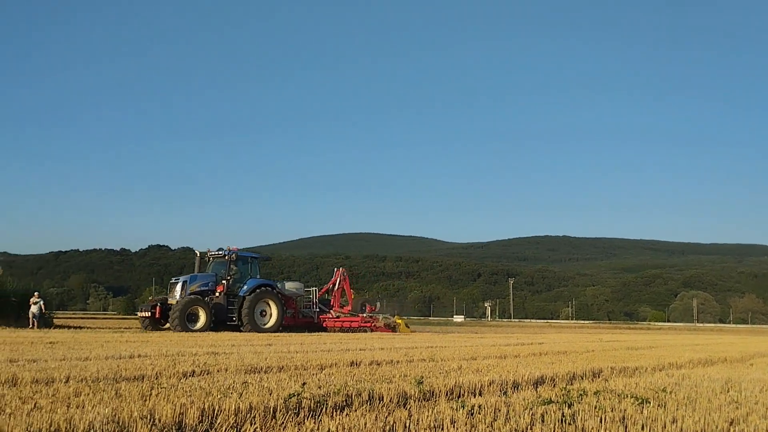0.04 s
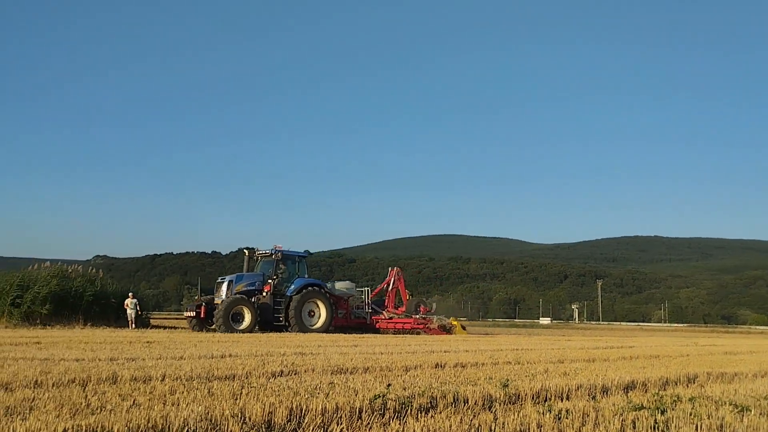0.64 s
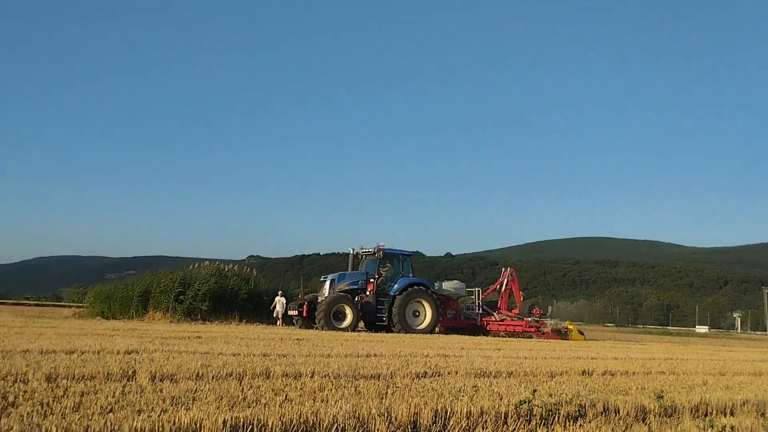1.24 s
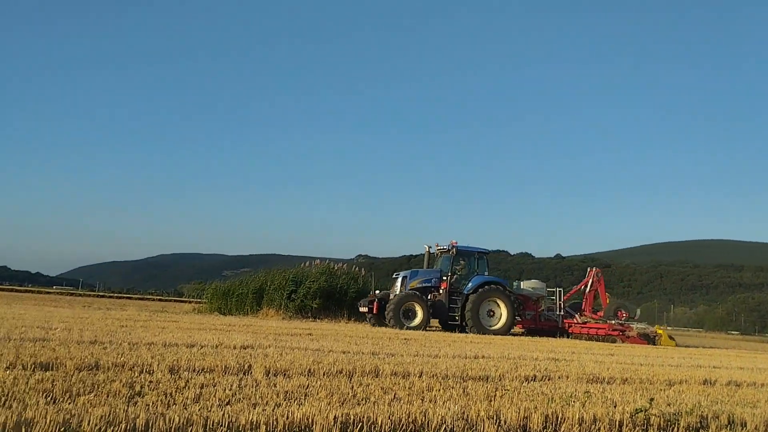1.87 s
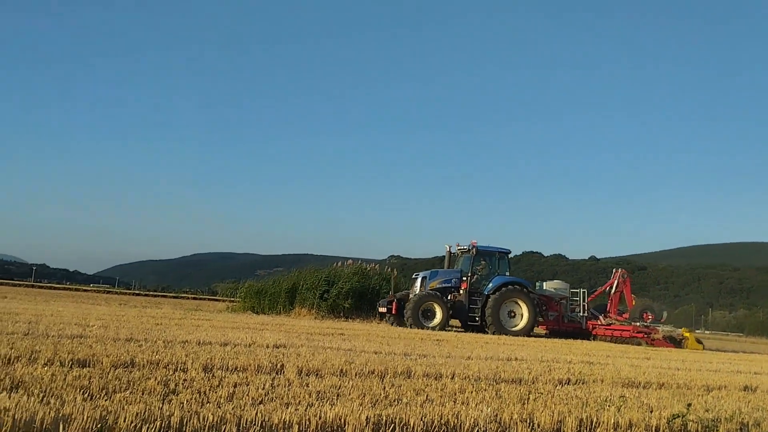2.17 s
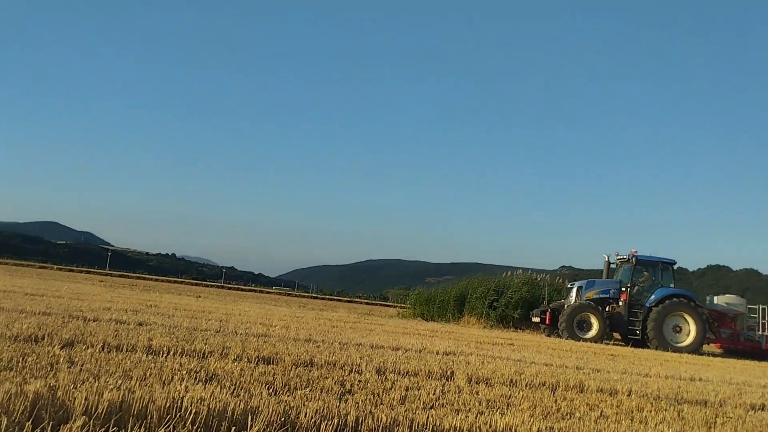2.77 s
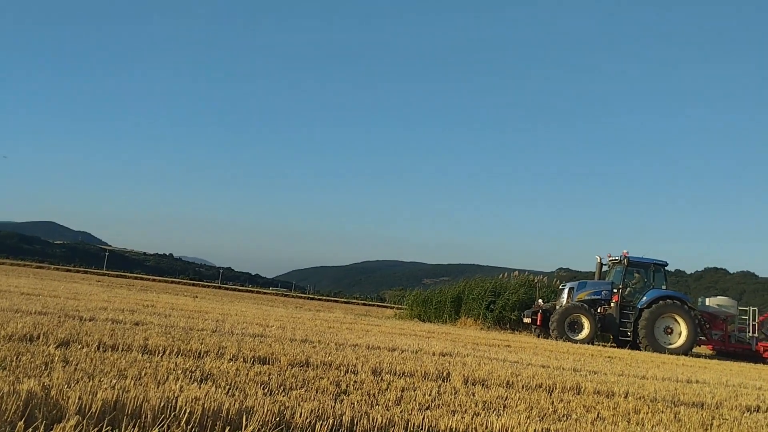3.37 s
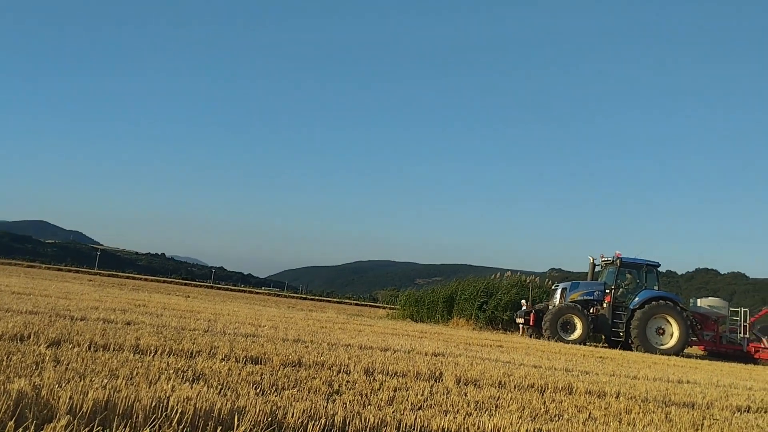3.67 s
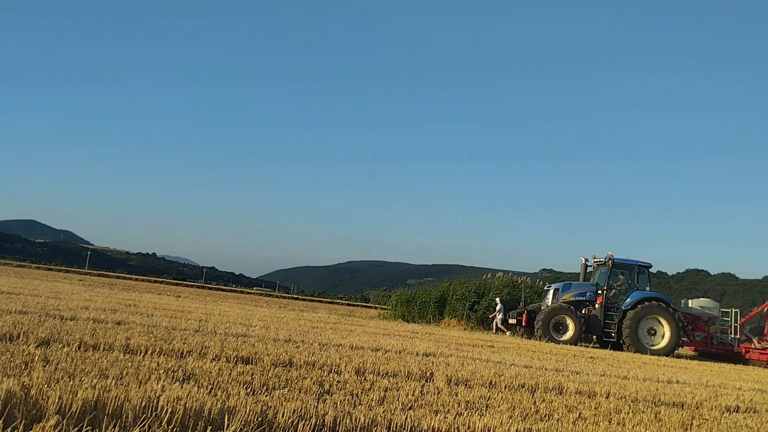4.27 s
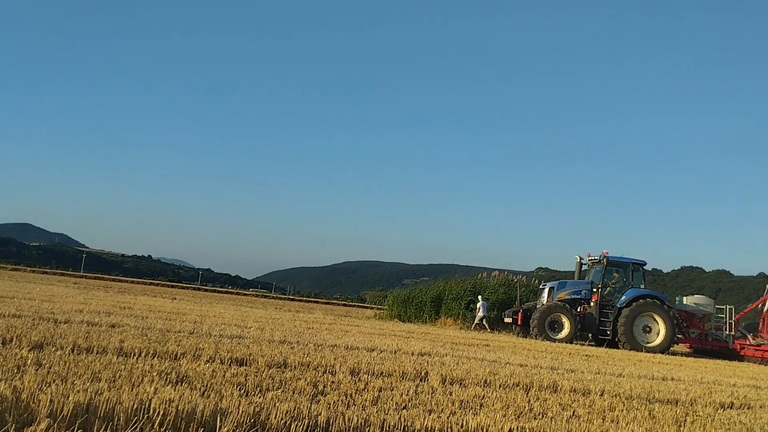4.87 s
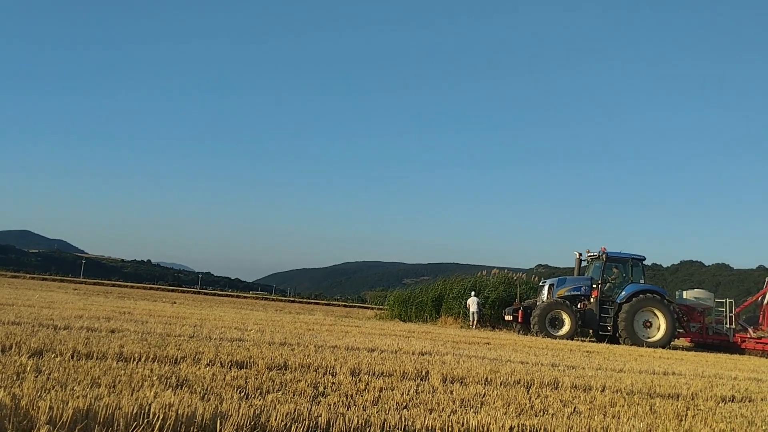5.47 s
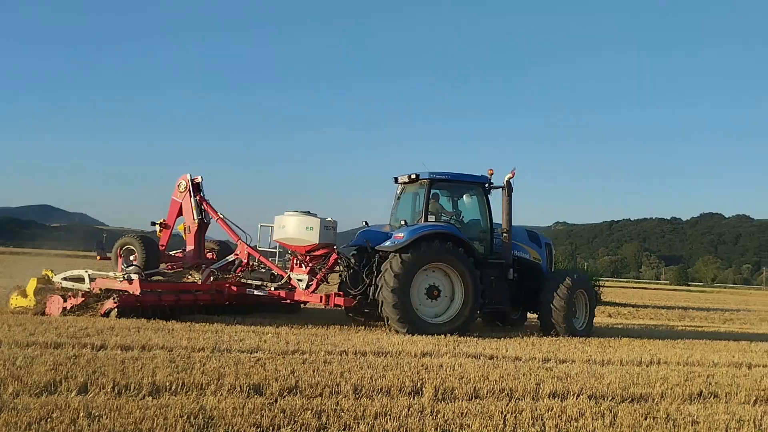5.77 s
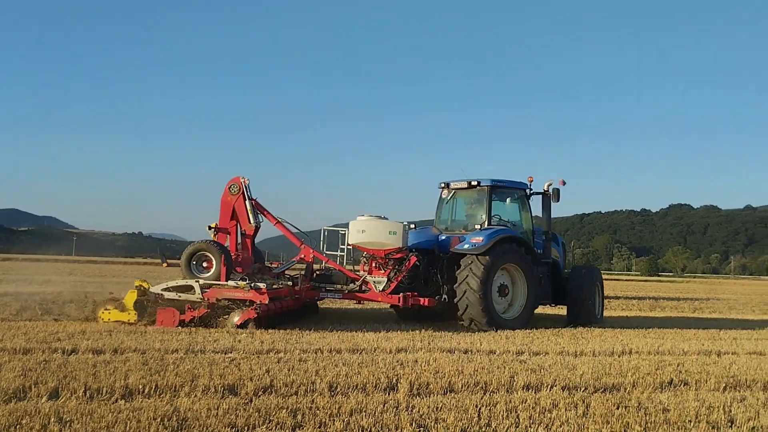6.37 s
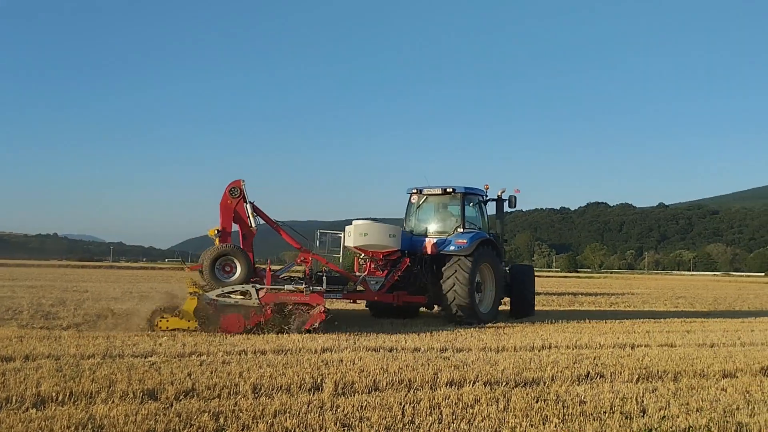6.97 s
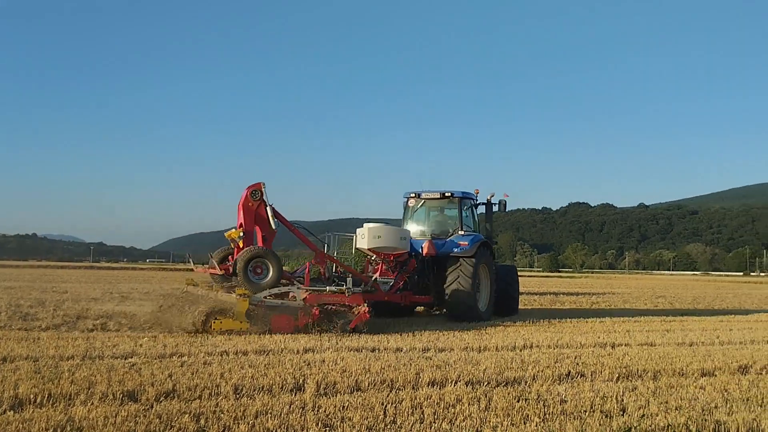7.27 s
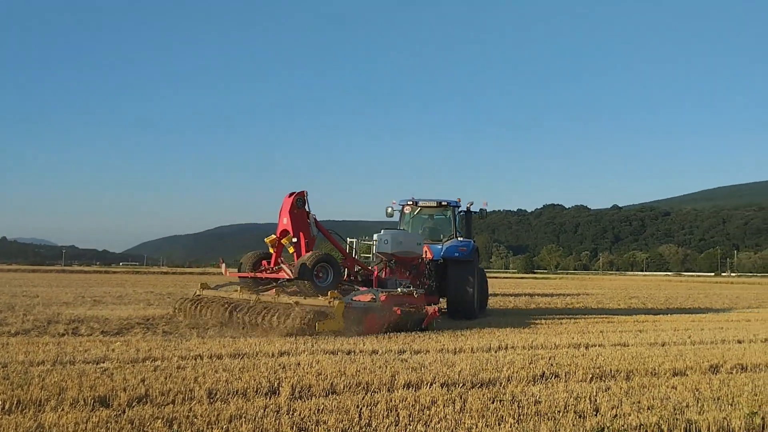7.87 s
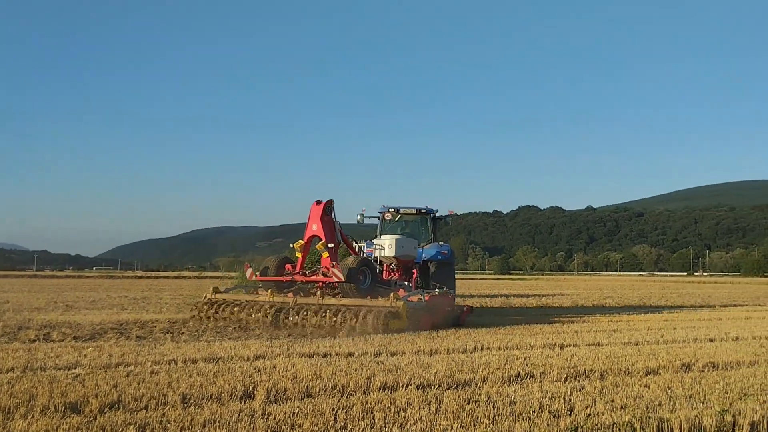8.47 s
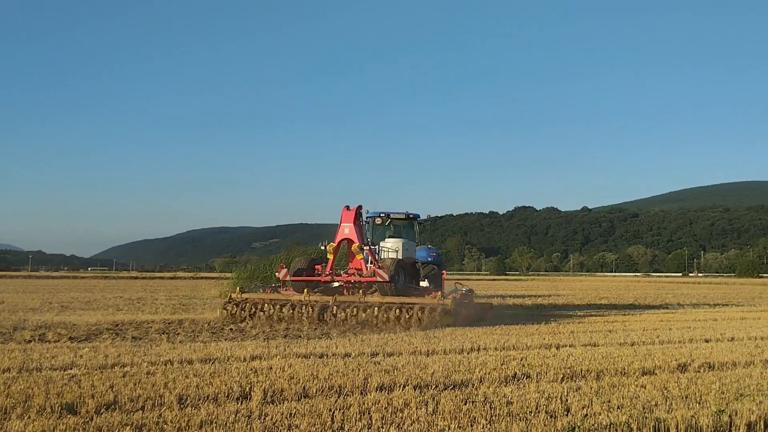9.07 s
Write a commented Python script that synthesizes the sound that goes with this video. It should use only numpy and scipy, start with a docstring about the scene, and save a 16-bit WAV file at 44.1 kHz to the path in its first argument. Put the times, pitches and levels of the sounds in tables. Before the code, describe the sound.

A diesel tractor drones across a field in a gusty breeze, then suddenly roars past close by, stones clinking on its harrow, and draws away.

```python
"""A six-cylinder diesel tractor drags a disc harrow over stubble, in two shots in a gusty breeze.
First it approaches from afar, sagging under load: the exhaust booms at the firing rate under injection
clatter, engine overtones, fan and gear whine, turbo hiss and high singing steel. Just past a second in,
the turbo blows off and the revs recover. After a cut at 5.5 s it roars past close by, stones clink on
the discs, and it draws away, the hood hiding more of the clatter, until a low engine hum swells."""
import sys
import numpy as np
from scipy import signal
from scipy.fft import rfft, irfft, next_fast_len
from scipy.io import wavfile
from scipy.ndimage import uniform_filter1d, map_coordinates

SR = 44100
rng = np.random.default_rng(int(sys.argv[2]) if len(sys.argv) > 2 else 0)


def waveform_to_disk(signal):
    """Save audio, clipped to [-1, 1], as 16-bit WAV at the path in sys.argv[1]."""
    frames = np.transpose(np.atleast_2d(signal))
    scaled = np.clip(frames, -1, 1) * 32767
    samples = np.round(scaled).astype(np.int16)
    wavfile.write(sys.argv[1], SR, samples)


N = 406602
TIME = np.arange(N) / SR

# engine speed, sagging whenever the discs bite: (time [s], firing rate [Hz])
ENGINE_SPEED = [(0.0, 92.9), (0.33, 87.65), (1.04, 86.34), (1.18, 94.42), (1.34, 94.2), (2.06, 91.1),
                (2.72, 90.08), (3.1, 92.22), (5.64, 93.01), (6.0, 91.56), (6.35, 93.97), (6.55, 92.66),
                (7.22, 93.52), (8.03, 92.96), (8.3, 90.58), (8.88, 88.17), (9.2, 88.64)]
# base mix of the far shot, by layer: (level [dB])
FAR_MIX = dict(boom=-22, octave=-34, rumble=-33, orders=-30.5, roar=-42, clatter=-39, rattle=-46.5, hiss=-55.5)
# tone colour of exhaust and running gear, front and rear: (frequency [Hz], relative level [dB])
FRONT_PIPE = [(15, 14), (35, -10), (70, -5), (160, -2), (220, -5), (290, -3), (370, -13), (440, -18),
              (560, -19.5), (690, -18), (800, -16), (930, -21.5), (1070, -16), (1180, -16.5)]
REAR_PIPE = [(15, -12), (35, -3), (70, 1), (160, -3), (220, 0), (290, -8), (370, -10.5), (440, -10.5),
             (560, -13.5), (690, -5.5), (800, -9), (930, -8.5), (1070, -11), (1180, -26.5)]
# tone colour of engine block and air flow, front and rear: (frequency [Hz], relative level [dB])
FRONT_BLOCK = [(1450, -3.5), (1950, -5), (2200, -1), (2700, -4.5), (3150, -9), (3380, -8.5), (3850, -13),
               (4750, -14), (5250, -16.5), (7100, -18.5), (8000, -28.5), (9500, -27.5), (11000, -35.5),
               (12500, -25.5), (15700, -28)]
REAR_BLOCK = [(1450, 1), (1950, -5), (2200, 0), (2600, -7), (3300, -12.5), (4100, -13), (4750, -15.5),
              (5400, -15.5), (7100, -18.5), (8300, -31), (9500, -24.5), (11000, -28), (12500, -21),
              (15700, -19.5)]
# stereo image, front and rear: (frequency [Hz], left-right correlation [0-1])
FRONT_IMAGE = [(25, 0.42), (70, 1), (200, 0.99), (1000, 0.96), (2500, 0.84), (4000, 0.8), (7000, 0.47),
               (12000, 0.28)]
REAR_IMAGE = [(25, 0.35), (70, 0.78), (200, 1), (1000, 0.92), (2300, 0.86), (3500, 0.4), (6000, 0.21),
              (12000, .1)]
# throb of unequal cylinders, relative to the "orders" layer:
# (pitch [x four-stroke cycle rate], front level [dB], rear level [dB])
THROB = [(2, -9, -27), (3, -24, -32), (4, -33, -34), (8, -20, -23.5), (9, -11.5, -17.5), (10, -12.5, -18),
         (11, -17.5, -18), (13, -22.5, -26), (14, -9, -24.5), (18, -17, -36), (24, -16, -32.5)]
# engine overtones with fan and gear whine, locked to the crankshaft: (pitch [x cycle rate])
WHINE_ORDERS = [10.45, 25.85, 28, 32, 33, 38, 42, 44, 45, 48, 51.65, 57, 67.15, 68.1]
# those tones relative to the roar:
# (front level [dB], abeam level [dB], change on turning away [dB/rad], change behind the harrow [dB])
WHINE_LEVELS = [(-23, -13.5, 8, 6), (-7, -20, 9.5, -6), (-29, -19.5, 10.5, -11.5), (-22, -29, 16.5, -7.5),
                (-14.5, -34, -7, -9), (-21.5, -18, 1, -3), (-26.5, -18, 1, -7), (-25, -12.5, -0.5, -4),
                (-20.5, -21, 1, -3), (-12, -36, 1, -1), (-17.5, -5, -6.5, 3), (-26, -13.5, -6, -5),
                (-31, -19.5, 11, -17), (-26, -14.5, 5.5, -13)]
# tones of the lugging engine: (pitch [x cycle rate], level [dB], middle of fade-out [s])
LUGGING_TONES = [(10.5, -39.5, 1.25), (57, -56, 2.4), (60, -59, 2.4), (69, -59, 2.4), (75, -56, 2.6),
                 (81, -57, 2.4)]
# spells of turbo whistle: (start [s], end [s], pitch [Hz], level [dB])
TURBO_SPELLS = [(-.5, 1.4, 9200, -67), (5.5, 5.8, 10480, -61), (5.85, 6.45, 10525, -55.5),
                (6.4, 7.1, 5160, -58)]
# tone colour of the wind: (frequency [Hz], relative level [dB])
WIND_COLOUR = [(10, -2), (25, 0), (45, 1), (90, 2)]
# gusts: (centre [s], length [s], lift above the lull [dB])
GUSTS = [(2.4, 4.8, 13), (4.3, 1.8, 9.4), (5.5, 1.2, 19), (8.4, 2.1, 16)]
# narrow ringing bands: high steel singing, plus a low engine hum as the tractor draws away:
# (start [s], end [s], pitch [Hz], half-width [Hz], level [dB])
RINGING_BANDS = [(.45, 2.2, 1086, 79, -47), (0.599, 2.6, 2170, 68.8, -47.5), (.75, 1.26, 4170, 130, -56),
                 (1.6, 2.3, 4750, 90, -60), (2.45, 3.05, 4640, 85, -55.5), (3.05, 4.4, 4720, 110, -63.5),
                 (3.2, 5.5, 3370, 82, -60), (4.42, 4.9, 4764, 100, -57.5), (4.45, 5.45, 6800, 240, -58),
                 (7.9, 9.06, 5553, 172, -65), (8.45, 9.6, 296, 11.4, -44.5)]
# base mix of the close pass, by layer: (abeam level [dB], change on turning away [dB/rad])
NEAR_MIX = dict(boom=(-12, -0.5), orders=(-10.5, -3), octave=(-33, 1), rumble=(-27.5, 1.5), growl=(-34, -3),
            roar=(-27, -5), clatter=(-30, -8.5), rattle=(-40, -5.5), hiss=(-42.5, -2))
# stones hitting the discs: (time [s], peak level [dB], ring pitch [Hz])
STONE_HITS = [(5.804, -26, 4900), (5.978, -20, 4200), (9.071, -27.5, 1447)]
# modes of a disc: (pitch [x ring pitch], relative level [dB], time to fall 60 dB [s])
DISC_MODES = [(1, 0, .022), (1.15, 0, .018), (1.31, 2, .02), (1.47, -2, .016)]
# the tractor's bearing as a delay pan: (time [s], lag of left behind right [ms])
PAN_LAG = [(0, -0.071), (1.35, 0.00078), (2.2, 0.088), (2.8, 0.16), (3.3, 0.11), (5.45, 0.11), (5.6, 0.055),
           (6.3, 0.073), (8.6, -0.0099)]
# EQ tilt between the channels: (frequency [Hz], left minus right [dB])
CHANNEL_TILT = [(200, 0), (380, 1), (700, -.8), (2400, -1.8), (5000, -1.8), (8000, .5), (13000, 3.3)]

CUT_S, ABEAM_S = 5.532, 5.65
NEAREST_M, DRIVE_M_PER_S = 5.25, 4.02
WEAK_CYLINDER = 2  # place in the firing order, from 0
UNLOAD_S, RECOVER_S = 1.24, 0.29  # the governor cuts the fuel as the first heavy pull ends
WORKING_HZ, OCTAVE_DB_PER_HZ = 90.6, 0.6  # the octave thins out below the working firing rate
BLOW_OFF_S, BLOW_OFF_LENGTH_S = 1.16, .3
TOP_HZ = 15780


def amp(db):
    """Decibels to gain."""
    return 10 ** (np.asarray(db) / 20)


def unit(x):
    """Scaled to rms 1."""
    return x / np.sqrt(np.mean(x ** 2) + 1e-20)


def along(points, hz):
    """A curve read on a log frequency axis."""
    freqs, values = np.transpose(points)
    return np.interp(np.log(hz + 1), np.log(freqs + 1), values)


def automation(points):
    """(time, value) breakpoints as one value per sample."""
    return np.interp(TIME, *np.transpose(points))


def step(at, takes):
    """A smooth rise from 0 to 1, centred on a moment."""
    return .5 + .5 * np.sin(np.pi * np.clip((TIME - at) / takes, -.5, .5))


def hump(at, length):
    """A smooth swell from 0 to 1 and back, centred on a moment."""
    return np.cos(np.pi * np.clip((TIME - at) / length, -.5, .5)) ** 2


def wobble(rate):
    """Smooth random modulation, rate knots a second."""
    knots = rng.standard_normal(int(N * rate / SR) + 4)
    coarse = TIME[::32]
    return np.interp(TIME, coarse, map_coordinates(knots, [coarse * rate]))


def turns(hz):
    """Periods completed so far at a changing rate."""
    return np.cumsum(hz) / SR


def filtered(x, response):
    """EQ by a gain that is a function of frequency."""
    size = next_fast_len(N + 8192, True)
    return irfft(rfft(x, size) * response(np.fft.rfftfreq(size, 1 / SR)), size)[..., :N]


def band(pair, colour, image, low_hz, high_hz):
    """Two unrelated noises become mid and side of one coloured stereo band, rms 1."""
    def response(hz):
        edges = (1 + (low_hz / (hz + 1)) ** 24) * (1 + (hz / high_hz) ** 24)
        width = np.arccos(np.clip(along(image, hz), -1, 1)) / 2
        return amp(along(colour, hz)) / np.sqrt(edges) * [np.cos(width), np.sin(width)]
    mid, side = filtered(pair, response)
    return unit(np.array([mid + side, mid - side]))


def far_levels():
    """Fader rides for the far shot (dB): nearly steady, but for the changing engine load."""
    load = 1 - step(UNLOAD_S, takes=0.095)
    overshoot = (1 - load) * np.exp(-np.abs(TIME - UNLOAD_S) / RECOVER_S)
    rattle_swell = hump(3, length=0.97)
    db = dict(FAR_MIX)
    db["boom"] += 4 * load - 3.5 * overshoot  # the governor cuts too far, then recovers
    db["octave"] += OCTAVE_DB_PER_HZ * (automation(ENGINE_SPEED) - WORKING_HZ)
    db["hiss"] += 6.3 * hump(BLOW_OFF_S, BLOW_OFF_LENGTH_S) - 0.6 * TIME
    db["roar"] += 0.17 * TIME  # grows with the approach
    db["rattle"] += rattle_swell - 0.5 * load
    db["clatter"] += 0.5 * rattle_swell
    return db


def combustion(cycle, repeat, pulse_db, lope_db):
    """Two noises pulsing with the firings; a share of the first repeats every engine cycle."""
    pattern = rng.standard_normal(2800)
    looped = unit(map_coordinates(pattern, [cycle % 1 * len(pattern)], mode="grid-wrap"))
    noise = np.sqrt(1 - repeat) * rng.standard_normal((2, N))
    noise += np.sqrt(repeat) * np.array([looped, rng.standard_normal(N)])
    angle = 2 * np.pi * cycle
    firing = np.cos(6 * angle)
    lope = np.cos(3 * angle) + .7 * np.cos(2 * angle)
    return noise * amp(pulse_db * firing + lope_db * lope)


def air_drift(x, depth_db, smooth_frames):
    """Ground echo and moving air lay slowly shifting peaks and notches on the sound."""
    hz, _, spectrum = signal.stft(x, SR, nperseg=1024)
    ripple = rng.standard_normal(spectrum.shape[1:])
    for _ in range(2):
        ripple = uniform_filter1d(ripple, size=3, axis=0)
        ripple = uniform_filter1d(ripple, size=smooth_frames, axis=1)
    reach = np.clip(hz / 4200, 0, 1)[:, None]  # the lows are hardly touched
    return signal.istft(spectrum * amp(depth_db * reach * unit(ripple)), SR, nperseg=1024)[1][:, :N]


def exhaust_tones(cycle, db, throb_db, flutter_db, lean):
    """The firing note and its octave; a weak cylinder dents one crest a cycle and makes them throb."""
    angle = 2 * np.pi * cycle
    firing = 6 * angle
    boom = amp(db["boom"] + flutter_db * wobble(12)) * np.cos(firing)
    # lean (radians) tips pointed crests towards a sawtooth
    octave = amp(db["octave"] + 0.82 * wobble(5.6)) * np.cos(2 * firing - lean)
    dent = np.zeros(N)
    for (order, *_), level in zip(THROB, throb_db):
        size = amp(level) * (1 + .06 * wobble(2.9))
        dent += size * np.cos(order * angle + .06 * wobble(3.3))
    return np.sqrt(2) * (boom + octave - amp(db["orders"]) * dent)


def whines(cycle, orders, levels_db, blur_rad):
    """Engine overtones with fan and gear whine, locked to the crankshaft and blurred by moving air."""
    out = np.zeros(N)
    for order, db in zip(orders, levels_db):
        phase = 2 * np.pi * order * cycle + blur_rad * wobble(16)
        out += amp(db + 0.46 * wobble(8)) * np.sin(phase)
    return np.sqrt(2) * out


def tractor_approaching(cycle):
    """Far off and head-on: a steady exhaust boom under the clatter of the block."""
    def layer(colour, low_hz, high_hz, **pulsing):
        return band(combustion(cycle, **pulsing), colour, FRONT_IMAGE, low_hz, high_hz)
    db = far_levels()
    rumble = layer(FRONT_PIPE, 42, 420, repeat=.27, pulse_db=3, lope_db=-.5)
    roar = layer(FRONT_PIPE, 451, 1216, repeat=.31, pulse_db=1, lope_db=-.25)
    out = rumble * amp(db["rumble"]) + roar * amp(db["roar"])
    clatter = layer(FRONT_BLOCK, 1330, 3060, repeat=.15, pulse_db=.5, lope_db=.25)
    out += clatter * amp(db["clatter"] + .9 * wobble(11))
    rattle = layer(FRONT_BLOCK, 3110, 7820, repeat=.098, pulse_db=1, lope_db=.9)
    out += rattle * amp(db["rattle"] + .9 * wobble(16))
    out = air_drift(out, depth_db=1.4, smooth_frames=40)
    hiss = layer(FRONT_BLOCK, 8950, 18700, repeat=0, pulse_db=.2, lope_db=1)
    out += hiss * amp(db["hiss"] + 1.1 * wobble(11))
    out += exhaust_tones(cycle, db, [front for _, front, _ in THROB], flutter_db=.5, lean=np.pi / 2)
    for order, tone_db, fade_s in LUGGING_TONES:
        out += (1 - step(fade_s, takes=.56)) * whines(cycle, [order], [tone_db], blur_rad=.2)
    whine_db = [front for front, *_ in WHINE_LEVELS]
    return out + amp(db["roar"]) * whines(cycle, WHINE_ORDERS, whine_db, blur_rad=.3)


def whistle(hz, scatter_hz):
    """A narrow, fuzzy air tone of rms 1."""
    return np.sqrt(2) * np.sin(2 * np.pi * turns(hz + scatter_hz * wobble(220)))


def turbo():
    """The turbo whistles in spells; its blow-off is a thin squeal that dips in pitch."""
    out = np.zeros(N)
    for start, end, hz, db in TURBO_SPELLS:
        out += amp(db) * hump((start + end) / 2, end - start) * whistle(hz, scatter_hz=42)
    puff = hump(BLOW_OFF_S, BLOW_OFF_LENGTH_S)
    squeal = whistle(hz=12880 - 680 * puff, scatter_hz=131)
    return out + amp(-54.5) * puff * squeal


def wind():
    """A light, gusty breeze buffets each side in its own way, harder on the left."""
    buffet = band(rng.standard_normal((2, N)), WIND_COLOUR, image=[(30, .33)], low_hz=5.9, high_hz=95)
    lull_db = -48.5
    gust_db = sum(db * hump(at, length) for at, length, db in GUSTS)
    return buffet * amp(lull_db + gust_db + 2 * wobble(6)) * amp([[1.8], [-1.8]])


def ringing_bands():
    """Narrow, rough bands swell and fade: high steel singing, and a low engine hum near the end."""
    out = np.zeros(N)
    for start, end, centre, width, db in RINGING_BANDS:
        progress = np.clip((TIME - start) / (end - start), 0, 1)
        swell = np.sqrt(np.abs(np.sin(np.pi * progress)))
        ring = filtered(rng.standard_normal(N), lambda hz: 1 / (1 + ((hz - centre) / width) ** 2))
        out += amp(db) * swell * unit(ring)
    return out


def near_levels(angle):
    """Fader rides for the pass (dB): layers fall with distance and shift with the side facing us."""
    distance_db = 20 * np.log10(np.cos(angle))  # the cosine is nearest over present distance
    db = {name: abeam + distance_db + turn * angle for name, (abeam, turn) in NEAR_MIX.items()}
    db["roar"] += 2.3 * hump(6.15, length=1.2)  # the harrow goes by
    db["octave"] += 9.07 * step(6.56, takes=.27)  # the pipe's mouth comes into view
    for name in ("roar", "growl"):
        db[name] -= 1.7 * step(8.6, takes=.82)  # the harrow screens the running gear
    return db


def tractor_passing(cycle):
    """Close, from the side and behind: exhaust and running gear roar as the hood hides the clatter."""
    def layer(colour, low_hz, high_hz, **pulsing):
        return band(combustion(cycle, **pulsing), colour, REAR_IMAGE, low_hz, high_hz)
    angle = np.arctan2(DRIVE_M_PER_S * (TIME - ABEAM_S), NEAREST_M)  # 0 abeam, growing as it leaves
    db = near_levels(angle)
    rumble = layer(REAR_PIPE, 29.97, 335, repeat=.27, pulse_db=-1.5, lope_db=3)
    roar = layer(REAR_PIPE, 580, 1221, repeat=.32, pulse_db=1.5, lope_db=1)
    out = rumble * amp(db["rumble"]) + roar * amp(db["roar"] + .28 * wobble(12))
    growl = layer(REAR_PIPE, 280, 560, repeat=.32, pulse_db=.5, lope_db=1)
    out += growl * amp(db["growl"])
    clatter = layer(REAR_BLOCK, 1260, 3440, repeat=.16, pulse_db=-.5, lope_db=.4)
    out += clatter * amp(db["clatter"] + .57 * wobble(15))
    rattle = layer(REAR_BLOCK, 3110, 7500, repeat=.046, pulse_db=1, lope_db=.6)
    out += rattle * amp(db["rattle"] + .6 * wobble(22))
    out = air_drift(out, depth_db=1, smooth_frames=30)
    hiss = layer(REAR_BLOCK, 7470, 16230, repeat=0, pulse_db=.5, lope_db=.5)
    out += hiss * amp(db["hiss"] + .5 * wobble(20))
    out += exhaust_tones(cycle, db, [rear for _, _, rear in THROB], flutter_db=.48, lean=0)
    screened = step(8.12, takes=.28)  # the harrow swings across and ducks most of the whines
    whine_db = [abeam + turn * angle + hidden * screened for _, abeam, turn, hidden in WHINE_LEVELS]
    return out + amp(db["roar"]) * whines(cycle, WHINE_ORDERS, whine_db, blur_rad=.4)


def stones():
    """Stones clink on discs that the soil damps at once."""
    out, t = np.zeros(N + SR), np.arange(SR // 4) / SR
    for at, db, hz in STONE_HITS:
        ring = sum(amp(level - 60 * t / t60) * np.sin(2 * np.pi * hz * ratio * t)
                   for ratio, level, t60 in DISC_MODES)
        out[round(at * SR):][:len(t)] += amp(db) * ring / np.abs(ring).max()
    return out[:N]


def scene():
    """One engine across a hard cut, panned by delay, with ringing bands and wind laid over it."""
    cycle = (turns(automation(ENGINE_SPEED)) - WEAK_CYLINDER) / 6  # six firings to a cycle
    close = step(CUT_S, takes=.002)
    tractor = (1 - close) * tractor_approaching(cycle) + close * tractor_passing(cycle)
    tractor += turbo() + stones()
    half_lag_s = automation(PAN_LAG) / 1000 / 2
    panned = [map_coordinates(channel, [(TIME - sign * half_lag_s) * SR], order=5, mode="nearest")
              for channel, sign in zip(tractor, (1, -1))]
    return np.array(panned) + ringing_bands() + wind()


def record(dry):
    """Master EQ: opposite tilts left and right, and a brick-wall low-pass."""
    def response(hz):
        tilt_db = np.outer([.5, -.5], along(CHANNEL_TILT, hz))
        return amp(tilt_db) * (hz < TOP_HZ)
    return filtered(dry, response)


dry = scene()
out = record(dry)
waveform_to_disk(out)
```